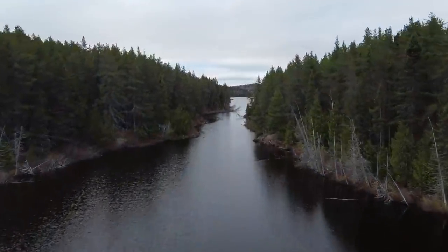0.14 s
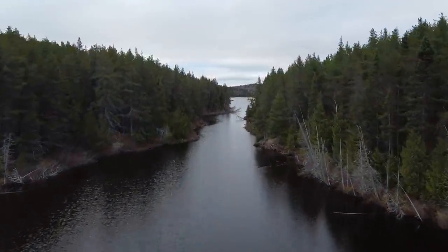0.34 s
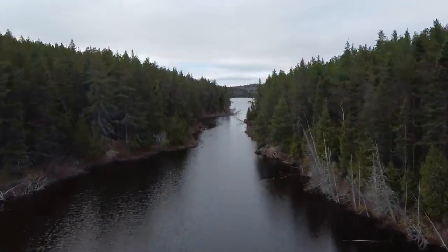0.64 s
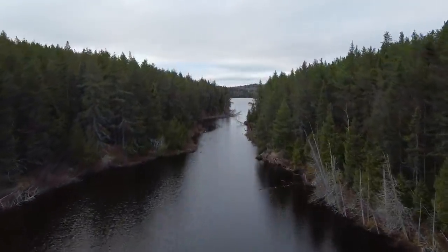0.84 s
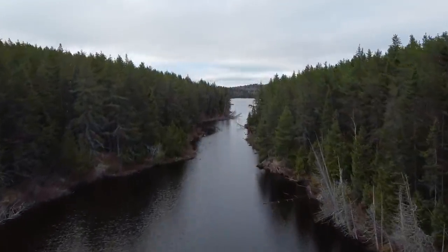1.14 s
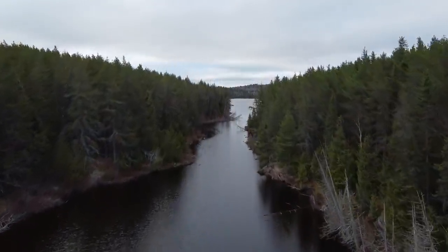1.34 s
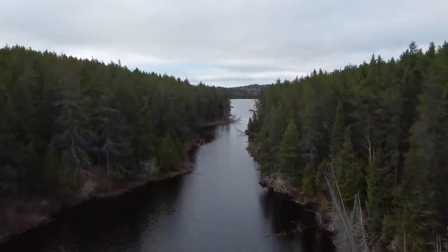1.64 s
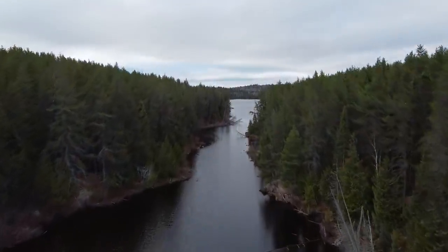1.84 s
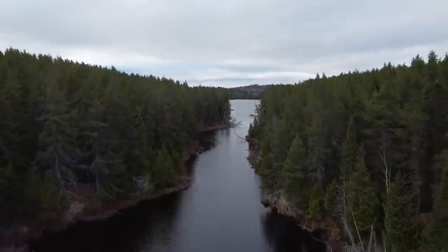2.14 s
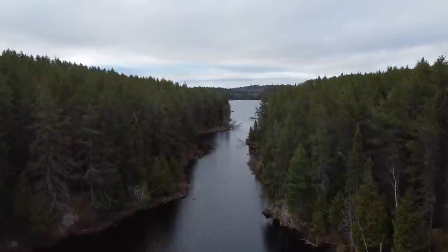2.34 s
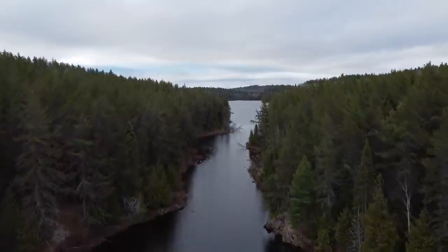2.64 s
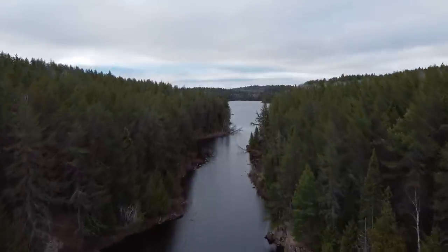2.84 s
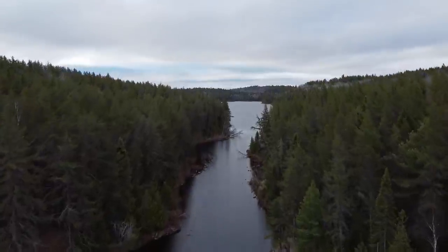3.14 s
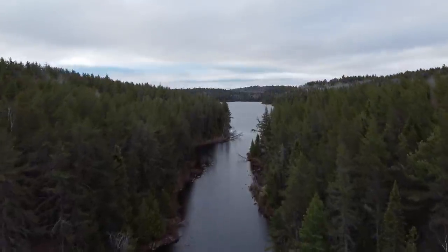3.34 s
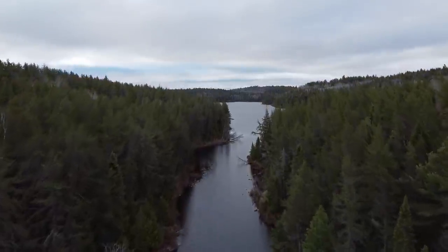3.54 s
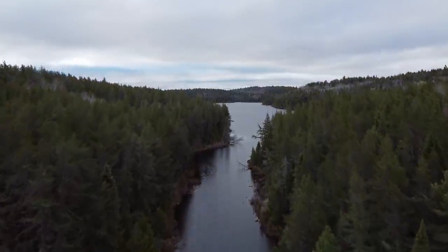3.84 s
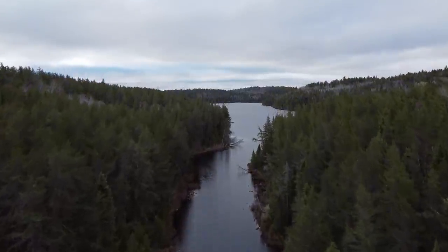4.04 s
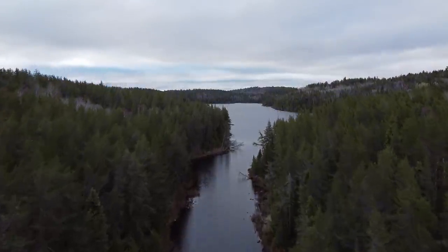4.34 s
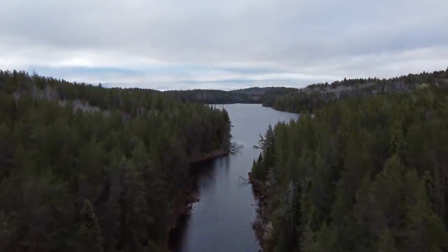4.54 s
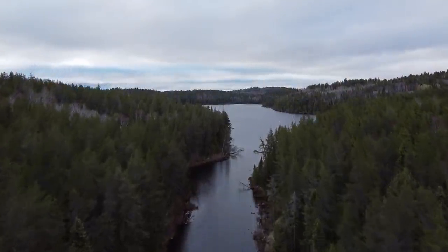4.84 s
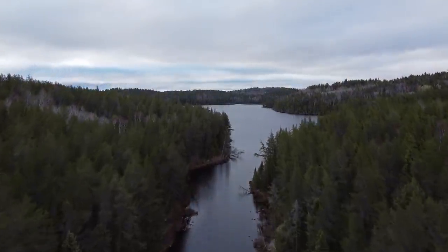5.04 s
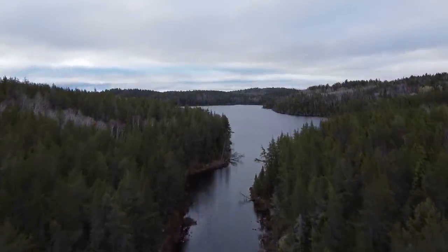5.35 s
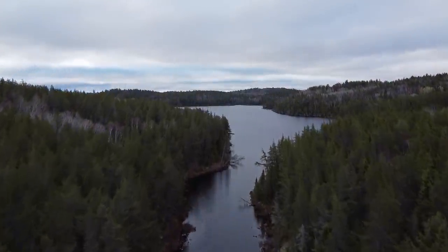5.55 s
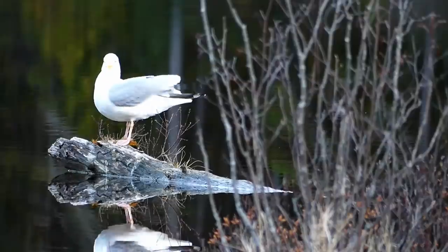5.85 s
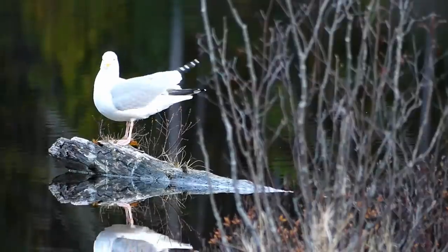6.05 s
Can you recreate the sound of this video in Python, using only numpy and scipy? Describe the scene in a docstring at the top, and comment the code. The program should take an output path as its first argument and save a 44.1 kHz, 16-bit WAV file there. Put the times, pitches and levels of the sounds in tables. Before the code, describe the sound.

Small frogs peep by a still forest lake, each call a high, clear, rising whistle about a fifth of a second long. Two close frogs dominate, one slightly lower in pitch; a third is higher and softer, a fourth distant. The echo of earlier calls is already fading at the start. Peeps cluster from 0.7 to 1.2 seconds, then come at 2, 2.3, 2.7, 3.3 and 3.6, cluster again from 4.3 to 5, and finish with a pair at 5.7 and 6. From 2.1 to 2.7 seconds another frog adds a quieter, raspy trill of rapid, slightly slowing pulses. A faint strained squeak comes at 4.6. Tiny rising or falling chirps are scattered between calls, with very soft, brief rustles around 2 to 3 seconds and at 4.6. Calls bounce off nearby trees and ring gently for seconds, over faint steady air and microphone hiss.

```python
"""Spring peepers at dusk on a forest lake: four males peep in turn, each on his own rising glide.
A peep is a harmonic larynx tone, its second partial boosted by the vocal sac. Brief faint glides
rise or fall; a rival adds a raspy pulsed trill; one strained squeak and soft rustles come between.
Near trunks answer quickly, the forest rings for seconds. Faint air and microphone hiss lie underneath."""
import sys
import numpy as np
from scipy import signal
from scipy.fft import rfft, irfft, next_fast_len
from scipy.io import wavfile
from scipy.ndimage import map_coordinates

SR = 44100
rng = np.random.default_rng(int(sys.argv[2]) if len(sys.argv) > 2 else 0)


def dump(signal):
    """Clip the signal to [-1, 1] and save it as 16-bit WAV at the path in sys.argv[1]."""
    limited = np.clip(np.atleast_2d(signal).T, -1, 1)
    pcm = np.round(limited * 32767).astype(np.int16)
    wavfile.write(sys.argv[1], SR, pcm)


N = 273861

# peeps: (time [s], length [s], pitch offset [Hz], male)
PEEPS = [ (-.31, .225, 2, "low"), (-.3, .22, -25, "rising"), (.686, .216, -4, "rising"),
         (.764, .18, -45, "far"), (.966, .225, -7, "low"), (1.047, .18, 50, "high"),
         (1.993, .208, 18, "rising"), (2.272, .232, -2, "low"), (2.684, .183, -28, "high"),
         (2.689, .19, 0, "far"), (3.316, .24, 0, "low"), (3.619, .208, 4, "rising"), (4.258, .19, 0, "far"),
         (4.408, .165, 8, "high"), (4.699, .212, -3, "rising"), (4.741, .241, 2, "low"),
         (5.739, .222, -12, "rising"), (6.022, .245, 2, "low")]
# sac glide per male: (start [Hz], end [Hz], upward bow [ratio], onset overshoot [Hz])
GLIDES = {"rising": (2436, 2945, 0.1361, 0), "low": (2092, 2302, -0.11, 190), "high": (2800, 3372, .7, 0),
          "far": (2700, 3090, 0.25, 0)}
# swell per male: (top gain [dB], sac ring-up [s], crest [share of call], fall one call from crest [dB])
SWELLS = {"rising": (-23.4, .009, .57, 19), "low": (-21.5, .006, .72, 9.5), "high": (-33.8, .005, .3, 23),
          "far": (-47, .003, 0.96, 7)}
# distance per male: (long forest ring against direct sound [dB])
WET_DB = {"rising": -23.5, "low": -25, "high": -23.5, "far": -13.5}
# brief faint glides: (time [s], length [s], start [Hz], end [Hz], level [dB])
CHIRPS = [(0.941, 0.043, 3180, 3096, -46.5), (1.835, .03, 1800, 1630, -60), (1.845, 0.033, 2646, 2350, -57),
          (2.315, 0.047, 2360, 2620, -41), (2.88, 0.047, 3154, 3040, -48.5),
          (3.022, .03, 3072, 2880, -55.5), (4.66, .035, 3220, 3120, -54), (5.106, 0.04, 2630, 2730, -48),
          (6.129, 0.087, 2370, 2584, -44)]
# rustles: (time [s], length [s], level [dB])
RUSTLES = [(1.824, .085, -61), (2.099, .045, -49.5), (2.611, .03, -52.5), (2.996, 0.1, -58.5),
           (4.622, 0.12, -54)]
# trill course: (time [s], sac pitch [Hz], tone level [dB], rasp level [dB])
TRILL_COURSE = [(2.09, 2110, -38, -63), (2.13, 2125, -37, -53.5), (2.27, 2176, -34.5, -55),
                (2.34, 2174, -34.5, -63.5), (2.56, 2157, -35, -68.5), (2.62, 2210, -39, -73)]
# strained pulse: (time [s], length [s], sac pitch [Hz], level [dB])
SQUEAK = (4.6, .042, 2000, -52)

# harmonics 1, 2, 3 ..: (relative level [dB]); peeps per male, rasp ahead of its resonance
PEEP_HARMONICS_DB = { "rising": [-32, -0.5, -31.5, -47, -49.5, -50, -52], "low": [-33, 0, -29, -38.5, -52,
                     -56, -52, -58], "high": [-31.5, -0.5, -34.5, -45, -41.5], "far": [-27, 2, -28, -35.5]}
TRILL_HARMONICS_DB = [-26.5, -0.5, -20.5, -29, -34, -31.5, -36]
RASP_HARMONICS_DB = [-60, -60, -60, -20, -5.5, -2.5, -0.5, -3]
SQUEAK_HARMONICS_DB = [-24.5, -5.5, 3, -10.5, -20.5, -25, -19.5, -17.5]

# noise spectra: (frequency [Hz], relative density [dB])
CLOSURE_SPECTRUM = [(900, -31.5), (1500, 0.5), (2100, 3.5), (3000, -5.5), (4200, -16.5), (5500, -35.5)]
AIR_SPECTRUM = [(20, -23.5), (55, -8.5), (100, -10.5), (145, -9.5), (173, 3.5), (205, -4.5), (260, -5),
                (330, -3), (700, -4), (1400, -7), (2000, -8), (3500, -21.5), (6000, -26.5)]
HISS_SPECTRUM = [(1000, -9), (4500, -6.5), (8000, -4.5), (11000, -2.5), (15500, 0)]
RUSTLE_SPECTRUM = [(900, -19), (1700, 5.5), (3200, 9.5), (4500, -6), (6000, -11.5), (8200, -11),
                   (9300, -20)]
HOARSE_SPECTRUM = [(1000, -17.5), (2000, 3.5), (4000, -7), (8200, -9.5), (9500, -20.5)]

LEAD_SAMPLES = SR  # the forest already rings at time zero


def amp(db):
    """Decibels to gain."""
    return 10 ** (np.asarray(db) / 20)


def unit_rms(x):
    """Scale to rms 1."""
    return x / np.sqrt(np.mean(x ** 2) + 1e-20)


def add(track, time_s, sound):
    """Mix a sound into a track with lead-in."""
    start = max(LEAD_SAMPLES + round(time_s * SR), 0)
    part = track[start:start + len(sound)]
    part += sound[:len(part)]


def wobble(rate_hz, size):
    """Smooth curve through random knots."""
    knots = rng.standard_normal(int(size * rate_hz / SR) + 4)
    return map_coordinates(knots, [np.arange(size) * rate_hz / SR])


def noise(spectrum, size):
    """Coloured noise, rms 1."""
    hz, db = np.transpose(spectrum)
    m = next_fast_len(size + 8192)
    gain = amp(np.interp(np.log(np.fft.rfftfreq(m, 1 / SR) + 1), np.log(hz), db))
    return unit_rms(irfft(rfft(rng.standard_normal(m)) * gain, m)[:size])


def progress(length_s):
    """Elapsed share u of a sound, 0 to 1."""
    return np.linspace(0, 1, int(length_s * SR))


def gate(u, length_s, edge_s):
    """Smooth fade in and out."""
    ramp = np.clip(np.minimum(u, 1 - u) * length_s / edge_s, 0, 1)
    return np.sin(np.pi / 2 * ramp) ** 2


def onset_snaps(sac_hz=2200, ring_s=.0004, span_s=.009, count=3):
    """The larynx starts with uneven snaps; the sac swells and decays after each."""
    starts_s = rng.uniform(0, span_s, (count, 1))
    t = np.maximum(np.arange(SR // 30) / SR - starts_s, 0)
    age = t / ring_s
    return np.sum(np.sin(2 * np.pi * sac_hz * t) * age ** 2 * np.exp(-age), axis=0)


def glide_hz(male, u, length_s, settle_s=.03):
    """Any overshoot settles; the pitch climbs along a bow as the sac fills."""
    start_hz, end_hz, bow, overshoot_hz = GLIDES[male]
    climb_hz = (end_hz - start_hz) * u * (1 + bow * (1 - u))
    return start_hz + climb_hz + overshoot_hz * np.exp(-u * length_s / settle_s)


def peep_gains(male, u, length_s, sac_hz, dip_hz=2633, dip_width_hz=55, dip_db=4, closing_s=.024):
    """One broad swell. The sac tone dips at one pitch; overtones start and stop first."""
    top_db, ring_up_s, crest, fall_db = SWELLS[male]
    swell = amp(top_db - fall_db * (u - crest) ** 2)
    dip = amp(-dip_db * np.exp(-((sac_hz - dip_hz) / dip_width_hz) ** 2))
    sac_gain = swell * dip * (1 - np.exp(-u * length_s / ring_up_s))
    closing = np.minimum((1 - u) * length_s / closing_s, 1)
    return sac_gain, np.sqrt(swell * swell.mean()) * closing


def larynx(sac_hz, harmonics_db, jitter, flutter_db, bloom_db=7, sac_gain=1, overtone_gain=1,
           top_hz=9000):
    """Harmonics of half the sac pitch. All but the second flutter; fifth and up arch by bloom_db."""
    size = len(sac_hz)
    phase = np.pi * np.cumsum(sac_hz * (1 + jitter * wobble(250, size))) / SR
    arch_db = bloom_db * (np.sin(np.linspace(0, np.pi, size)) - 2 / np.pi)
    tone = np.zeros(size)
    for k, db in enumerate(harmonics_db, 1):
        drift_db = (k != 2) * flutter_db * wobble(35, size) + (k > 4) * arch_db
        rolloff = 1 / (1 + (k * sac_hz / 2 / top_hz) ** 20)
        gain = (sac_gain if k == 2 else overtone_gain) * rolloff * amp(db + drift_db)
        tone += gain * np.sin(k * phase + rng.uniform(0, 2 * np.pi))
    return np.sqrt(2) * tone


def closure(length_s):
    """The vibration breaks into noise as the larynx closes."""
    u = progress(length_s)
    return np.sin(np.pi * u) ** 2 * noise(CLOSURE_SPECTRUM, len(u))


def peeper(male, snap_gain_db=-15.5, snap_lead_s=.007, closure_gain_db=-17.5, closure_s=.019):
    """One male's peeps from his own spot: snaps, gliding tone, rough closure."""
    track = np.zeros(LEAD_SAMPLES + N)
    for time_s, length_s, offset_hz, caller in PEEPS:
        if caller != male:
            continue
        u = progress(length_s)
        sac_hz = glide_hz(male, u, length_s) + offset_hz
        sac_gain, overtone_gain = peep_gains(male, u, length_s, sac_hz)
        tone = larynx(sac_hz, PEEP_HARMONICS_DB[male], jitter=.0012, flutter_db=2,
                      sac_gain=sac_gain, overtone_gain=overtone_gain)
        shimmer = amp(.2 * wobble(60, len(u)))
        add(track, time_s, shimmer * gate(u, length_s, edge_s=.009) * tone)
        add(track, time_s - snap_lead_s, amp(snap_gain_db) * sac_gain.max() * onset_snaps())
        rough_end = amp(closure_gain_db) * sac_gain[-1] * closure(closure_s)
        add(track, time_s + length_s - closure_s, rough_end)
    return forest(track, WET_DB[male])


def forest(track, wet_db, ring_t60_s=3.03, trunk_db=3, trunk_t60_s=.24, build_s=.021):
    """Direct sound, quick scatter off near trunks, long ring of the wooded shores. Drops the lead-in."""
    t = np.arange(3 * SR) / SR

    def tail(t60_s):
        envelope = amp(-60 * t / t60_s) * np.minimum(t / build_s, 1)
        return unit_rms(rng.standard_normal(len(t)) * envelope) / np.sqrt(len(t))

    response = tail(ring_t60_s) + amp(trunk_db) * tail(trunk_t60_s)
    reverb = signal.fftconvolve(track, response)[:len(track)]
    return (track + amp(wet_db) * reverb)[LEAD_SAMPLES:]


def air_and_hiss(air_db=-63, hiss_db=-63.2):
    """Still air over the lake and microphone self-noise."""
    return amp(air_db) * noise(AIR_SPECTRUM, N) + amp(hiss_db) * noise(HISS_SPECTRUM, N)


def chirps():
    """Brief faint glides, rising or falling; two trail the far male's peeps."""
    track = np.zeros(LEAD_SAMPLES + N)
    for time_s, length_s, start_hz, end_hz, db in CHIRPS:
        u = progress(length_s)
        sac_hz = start_hz + (end_hz - start_hz) * u
        tone = larynx(sac_hz, PEEP_HARMONICS_DB["rising"], jitter=.002, flutter_db=4)
        add(track, time_s, amp(db) * gate(u, length_s, edge_s=.0078) * tone)
    return forest(track, wet_db=-15)


def rustles():
    """Short, uneven noise bursts at the water's edge."""
    track = np.zeros(LEAD_SAMPLES + N)
    for time_s, length_s, db in RUSTLES:
        u = progress(length_s)
        flicker = amp(1.5 * wobble(150, len(u)))
        grain = unit_rms(flicker * noise(RUSTLE_SPECTRUM, len(u)))
        add(track, time_s, amp(db) * gate(u, length_s, edge_s=.02) * grain)
    return forest(track, wet_db=-9)


def trill_pulses(start_s=2.095, period_s=.0412, slowing_s=.00124, count=12):
    """Steadily slowing pulses; columns as in TRILL_COURSE."""
    k = np.arange(count)
    times_s = start_s + k * period_s + k * (k - 1) / 2 * slowing_s
    knots_s, *controls = np.transpose(TRILL_COURSE)
    return zip(times_s, *(np.interp(times_s, knots_s, control) for control in controls))


def trill(pulse_s=.026, sag=.072, hoarse_db=-21, rasp_hz=8200, rasp_width_hz=800, rasp_fall_db=5):
    """A rival's trill: each pulse sags in pitch; rough upper harmonics sweep through a resonance."""
    track = np.zeros(LEAD_SAMPLES + N)
    resonance = signal.iirpeak(rasp_hz, rasp_hz / rasp_width_hz, SR)
    u = progress(pulse_s)
    for time_s, mid_hz, tone_db, rasp_db in trill_pulses():
        sac_hz = mid_hz * (1 - sag * (u - .5))
        hoarse = amp(hoarse_db) * (1 - u) * noise(HOARSE_SPECTRUM, len(u))  # clears as the larynx locks
        tone = larynx(sac_hz, TRILL_HARMONICS_DB, jitter=.0061, flutter_db=2, bloom_db=0) + hoarse
        buzz = larynx(sac_hz, RASP_HARMONICS_DB, jitter=.007, flutter_db=3, bloom_db=-3)
        buzz += .9 * rng.standard_normal(len(u))
        rasp = unit_rms(signal.lfilter(*resonance, signal.lfilter(*resonance, buzz)))
        pulse = amp(tone_db) * tone + amp(rasp_db - rasp_fall_db * (u - .5)) * rasp
        add(track, time_s, gate(u, pulse_s, edge_s=.0036) * pulse)
    return forest(track, wet_db=-15.5)


def squeak(sag=.019):
    """One strained pulse, rich in overtones."""
    track = np.zeros(LEAD_SAMPLES + N)
    time_s, length_s, mid_hz, db = SQUEAK
    u = progress(length_s)
    sac_hz = mid_hz * (1 - sag * (u - .5))
    tone = larynx(sac_hz, SQUEAK_HARMONICS_DB, jitter=.0072, flutter_db=1)
    add(track, time_s, amp(db) * gate(u, length_s, edge_s=.004) * tone)
    return forest(track, wet_db=-17)


def scene():
    """Frogs over the quiet lake, mono."""
    frogs = sum(peeper(male) for male in GLIDES) + chirps() + trill() + squeak()
    return (frogs + rustles() + air_and_hiss())[None]


def record(dry, cutoff_hz=15780):
    """Recorder band limit: brick-wall low-pass."""
    m = next_fast_len(N + SR // 2)
    passband = np.fft.rfftfreq(m, 1 / SR) < cutoff_hz
    return irfft(rfft(dry, m) * passband, m)[..., :N]


dry = scene()
out = record(dry)
dump(out)
```